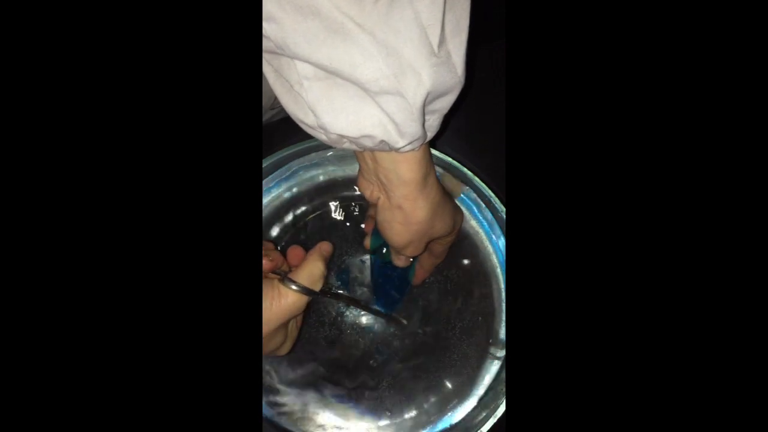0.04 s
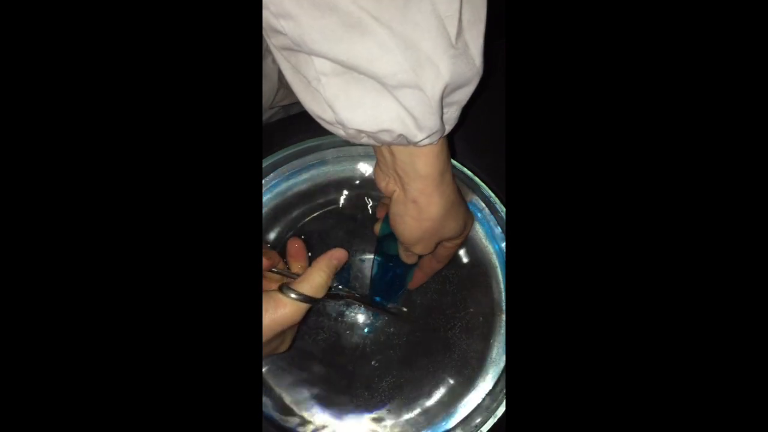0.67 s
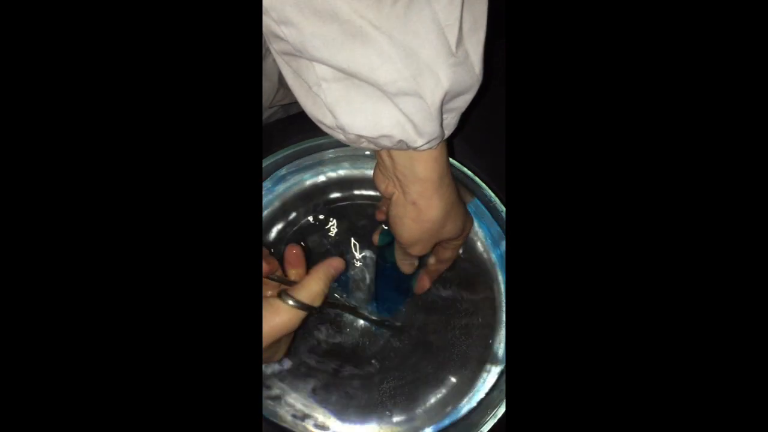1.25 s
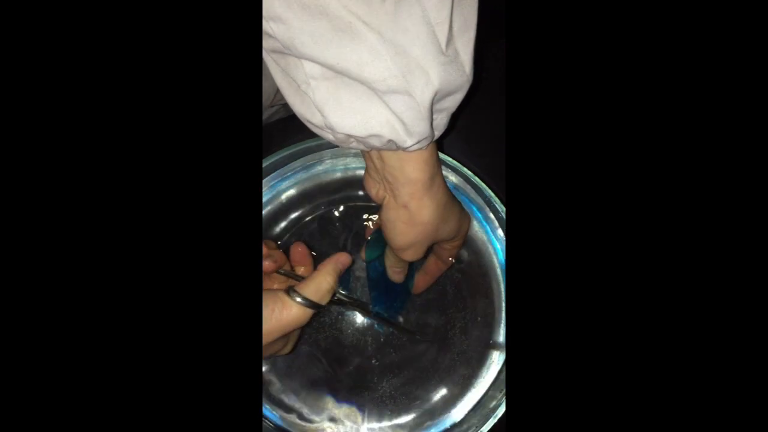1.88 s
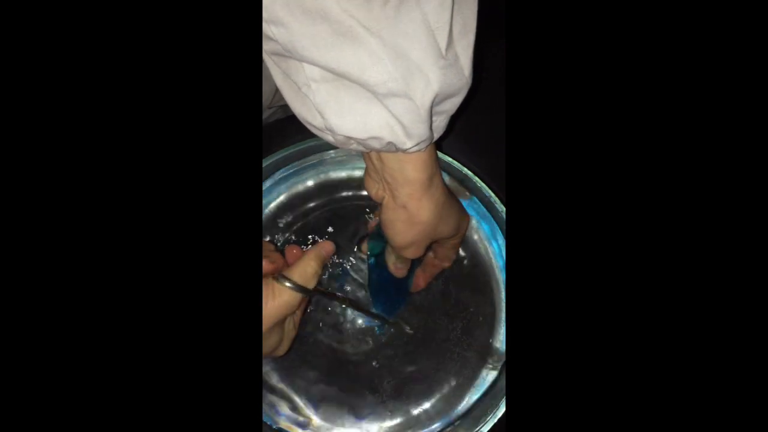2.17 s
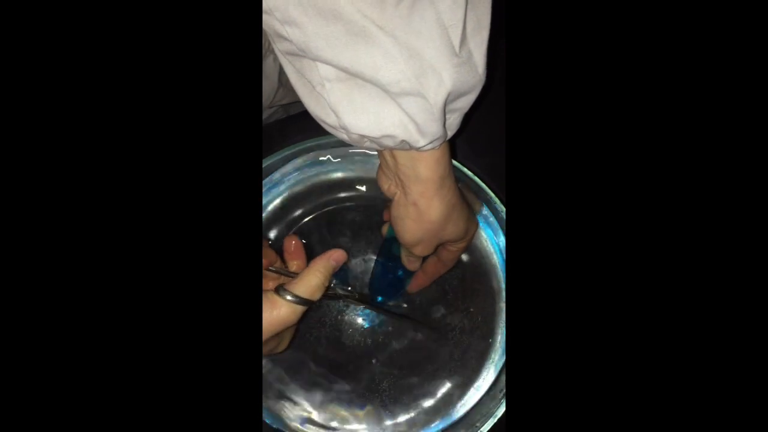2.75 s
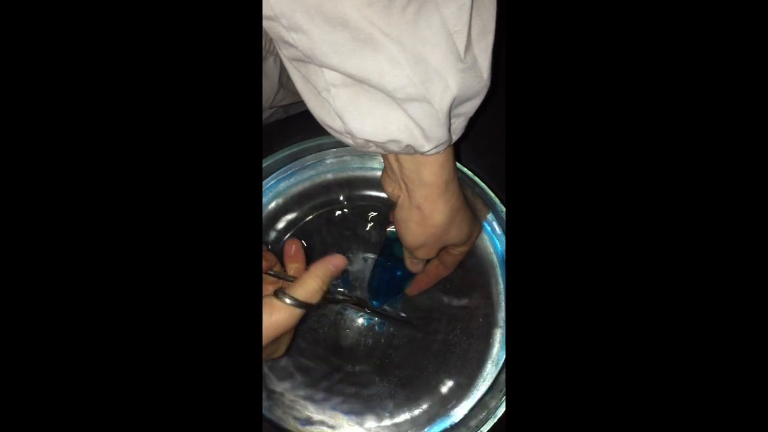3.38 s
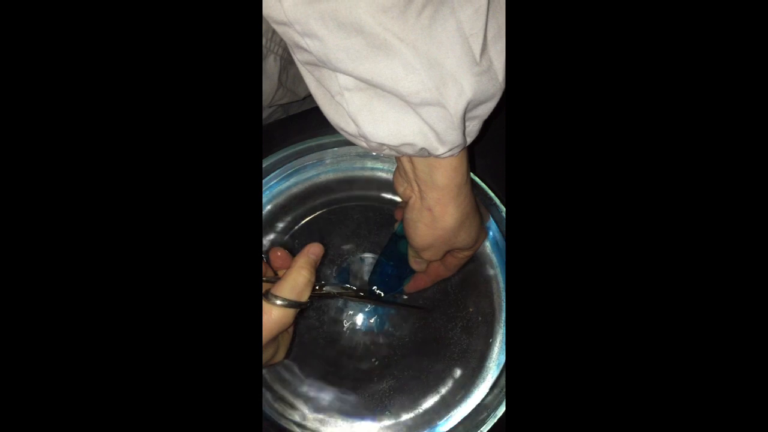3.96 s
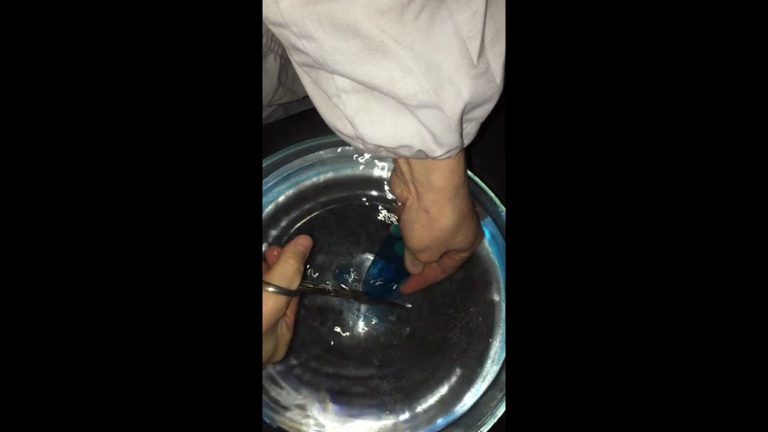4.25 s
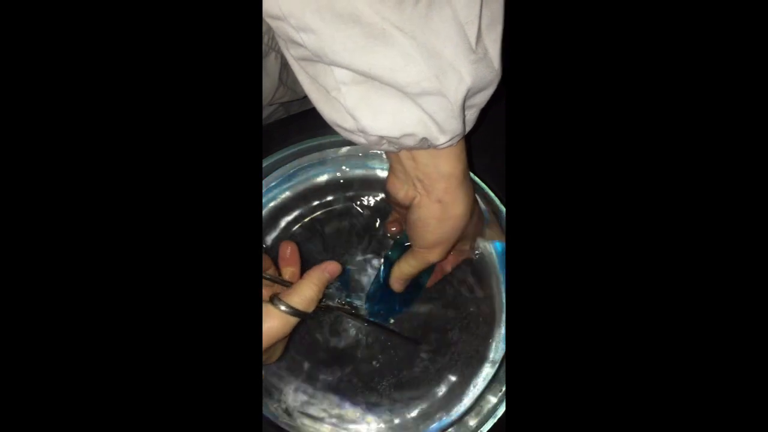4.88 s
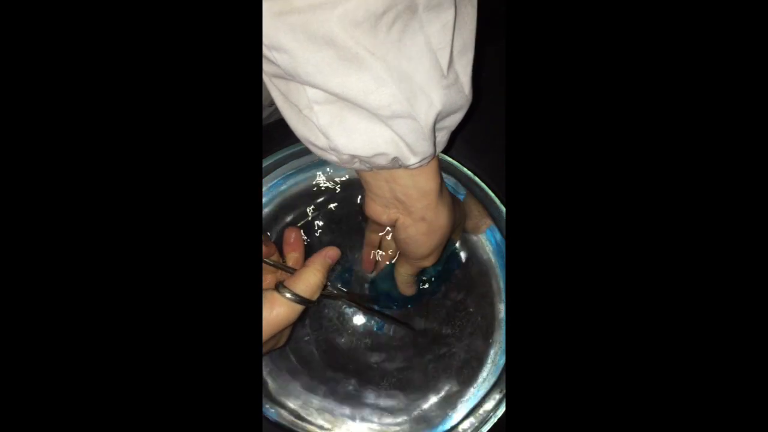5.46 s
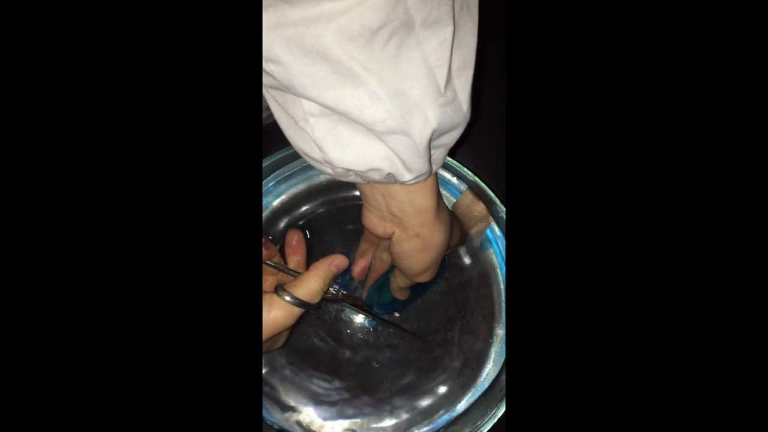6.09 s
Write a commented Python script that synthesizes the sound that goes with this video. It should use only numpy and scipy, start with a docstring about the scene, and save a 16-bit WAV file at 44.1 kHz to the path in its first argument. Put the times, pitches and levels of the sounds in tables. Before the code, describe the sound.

Scissors cut a sheet of glass under water in a bowl, heard up close in a small room. A faint scrape and one sharp crack come right at the start. Further bites follow at about 1.0, 2.1, 3.1 and 4.0 to 4.3 seconds, each a faint scrape of the blades and then a quick cluster of crisp, crunchy cracks. The cracks ring briefly and come with a hollow water knock and a low thud from the bowl. Between bites the glass taps softly, the scissors clink lightly and the water laps a little. At about 4.3 seconds a distinct bubble plops, followed at once by a steel clink. From there to about 6 seconds it is quieter, with a few small clinks, taps, bubbles and gentle laps. A soft low rumble of stirred water and a faint room hiss and hum lie underneath.

```python
"""A faint scrape, then a sharp crack: scissors nibble at a sheet of glass under water in a bowl.
In each of five bites the blades scrape, then the glass gives in bursts of tiny fractures that ring
the steel and jolt the bowl on its table. In between, the sheet taps and the scissors clink.
The hands stir the water, which laps, bubbles and rumbles. The small room hisses and hums faintly."""
import sys
import numpy as np
from scipy import signal
from scipy.fft import rfft, irfft
from scipy.io import wavfile

SR = 44100
rng = np.random.default_rng(int(sys.argv[2]) if len(sys.argv) > 2 else 0)


def wrap_up_sound(samples):
    """Save the sound to the file named by the first command line argument, as 16-bit audio."""
    columns = np.atleast_2d(samples).T
    # keep every value between -1 and 1, then stretch to whole-number steps
    tamed = np.clip(columns, -1, 1)
    steps = np.round(tamed * 32767).astype(np.int16)
    wavfile.write(sys.argv[1], SR, steps)


N = 270333

# Tilt is how far the treble stands above the lows. Decay is the time to fade by 60 dB.
# the glass cracks, once or more per bite: t/s, length/s, level/dB, tilt/dB, water knock/dB, bowl thud/dB
GLASS_CRACKS = [(0.0528, 0.0012, -43.5, 11, -37.5, -47), (0.8498, 0.00062, -56.5, 8.5, -61, -53.5),
                (0.9641, 0.0053, -40, 7.5, -41, -37.5), (1.0327, .0059, -34, 10.5, -40.5, -36.5),
                (1.079, .001, -52, 11.5, -49, -53.5), (1.901, .003, -56.5, 5, -66.5, -51.5),
                (2.03, 0.0035, -53, 5.5, -58.5, -68), (2.1059, 0.0023, -46.5, 3, -43.5, -46.5),
                (2.1386, 0.00053, -50.5, 9, -56.5, -65), (2.158, 0.012, -32, 9, -40, -37.5),
                (2.23, 0.0031, -36, 12.5, -42, -44.5), (2.9911, 0.0023, -47.5, 9.5, -47, -47),
                (3.0414, 0.0055, -46, 15, -49, -53), (3.0867, 0.0039, -44.5, 14, -43, -49.5),
                (3.1328, .0046, -38.5, 14, -34.5, -33.5), (3.143, 0.0013, -42.5, 8.5, -59, -59),
                (3.882, 0.0019, -61, 14.5, -68.5, -53.5), (3.949, .0006, -47.5, 17.5, -51.5, -45.5),
                (4.0165, 0.0057, -36.5, 10.5, -47.5, -45.5), (4.0666, .0008, -43, 12, -55, -59),
                (4.1407, 0.003, -37, 10, -48.5, -55.5), (4.1978, 0.0028, -62.5, 19.5, -71.5, -63.5),
                (4.2736, 0.0026, -34.5, 16.5, -36.5, -47), (4.29, .002, -40.5, -18, -51, -54.5)]
# tone colour of one fracture: f/Hz, level/dB
FRACTURE_COLOUR = [(150, -9), (400, -7), (1000, -3.5), (1500, -3.5), (2300, 6.5), (3500, -3), (4800, -7.5),
                   (5300, -1), (7600, 2), (9500, 2.5), (10300, -3), (11600, 3.5), (13800, 1), (15500, -6)]
# ringing tones of glass and blades under water: f/Hz, level/dB
GLASS_TONES = [(680, -9), (1020, -12.5), (1210, -5.5), (2080, -9.5), (2300, -3), (2720, -2.5), (4100, -9),
               (4420, -2.5), (5210, -3), (5500, -2.5), (6080, -2), (6800, -6.5), (7280, -6), (7900, -3.5),
               (8650, -3), (9250, -6), (9800, 2.5), (11580, 0)]
# bowl and table rocking: f/Hz, level/dB, decay/s
THUD_TONES = [(44, -12, 0.17), (54.4, -7.5, 0.88), (81.44, 6, 0.65), (100.37, -2.5, 0.75), (130.3, -6, .55)]
# ringing walls of the water-filled bowl: f/Hz, level/dB, decay/s
WALL_TONES = [(176.7, -2.5, 0.74), (255.7, -4, 0.96), (311, -2, 0.66), (329, -0.5, 0.35),
              (351.2, -2.5, 0.54), (444.3, -13, 0.13), (542, -4.5, 0.69), (574, -7.5, 0.33)]
# hollow knock of water pushed aside by the blades: f/Hz, level/dB, decay/s
KNOCK_TONES = [(204.7, -10, 0.043), (297.5, 4.5, 0.082), (400, -6, 0.017), (545, -9.5, 0.04),
               (686.4, -3.5, 0.068)]
# blades grinding on the edge of the glass: t/s, length/s, level/dB, tilt/dB
BLADE_SCRAPES = [(0, 0.052, -73.5, 13.5), (0.815, 0.027, -65, 6.5), (0.849, 0.031, -65.5, 3.5),
                 (0.88, 0.031, -80, 14), (1.299, 0.045, -74.5, 5), (1.869, .055, -67, 13.5),
                 (1.935, 0.21, -77.5, 12), (2.037, 0.013, -60, 1), (2.431, 0.06, -64.5, 13),
                 (2.864, 0.045, -74, 13), (2.909, 0.034, -66.5, 15.5), (2.984, 0.027, -59.5, 4.5),
                 (3.825, 0.025, -71, 14), (3.929, 0.072, -70.5, 9.5), (4.562, 0.024, -67.5, 1.5)]
# the sheet taps blade or bowl, or a hand nudges the bowl: t/s, level/dB, tilt/dB, water knock/dB, bowl thud/dB
TAPS_AND_NUDGES = [(.456, -67, -8, -53.5, -50.5), (0.649, -72, -20, -57.5, -70), (1.18, -63.5, -2.5, -60, -81),
                   (1.68, -57.5, -15.5, -57, -69), (1.859, -57.5, -0.5, -53.5, -55),
                   (2.675, -65.5, -29, -73, -73), (3.185, -52.5, -12, -70, -69),
                   (3.418, -71.5, -29, -64.5, -65.5), (3.597, -53, -11, -52.5, -63),
                   (5.034, -100, -12, -59, -63), (5.891, -68, -8, -67, -72.5)]
# the scissors open or shut: t/s, click level/dB, tilt/dB, ring/dB, bowl thud/dB
STEEL_CLINKS = [(0.563, -63, -8.5, -51, -60), (2.39, -58, -16, -57.5, -62), (2.413, -62, -14, -55, -72),
                (4.362, -42.5, -12, -46, -46.5), (4.587, -53, 0, -49.5, -70),
                (4.902, -92, -9, -66.5, -83.5), (5.161, -54, 4, -48.5, -81)]
# ringing tones of the scissors: f/Hz, level/dB
STEEL_TONES = [(1180, -6), (2440, -0.5), (2990, 2), (4100, -5), (5300, -4)]
# bubbles in the stirred water: t/s, f/Hz, level/dB, decay/s, glide/(octaves per s)
WATER_BUBBLES = [(.59, 1110, -57, .07, 0), (0.65, 1134, -50.5, 0.035, 10), (1.315, 900, -53.5, 0.087, 1.5),
                 (1.862, 990, -42.5, 0.069, 7), (4.2912, 710, -18.5, 0.023, -17),
                 (4.303, 660, -37, 0.18, 2), (4.315, 852.4, -38.5, 0.072, 1), (5.441, 978, -61, 0.39, 0),
                 (5.479, 850, -51.5, 0.11, -0.5), (5.5, 498, -56.5, .12, -4), (5.975, 1270, -57, .08, -4)]
# water lapping round the wrists: t/s, length/s, level/dB, centre f/Hz
WRIST_LAPS = [(0.588, 0.057, -69.5, 2180), (1.293, 0.048, -69.5, 1430), (1.84, 0.034, -65.5, 1010),
              (3.437, 0.041, -76, 1910), (5.476, .08, -68.5, 1390), (5.953, 0.032, -74.5, 1400)]
# rumble of the hands stirring the water: t/s, level/dB
STIR_LEVELS = [(0.0, -61), (0.08, -55), (0.24, -91), (0.48, -74), (0.7, -89), (1.09, -48), (1.4, -77.5),
               (2.1, -60.5), (2.24, -50.5), (2.78, -83), (3.07, -58), (3.62, -69), (3.94, -59),
               (6.13, -82.5)]
# the room's echo: f/Hz, level against the direct sound/dB, decay/s
ROOM_ECHO = [(207, -3, 0.83), (609, -15, .45), (1500, -9, 0.22), (3027, -9.5, 0.29), (5715, -15.5, 0.32),
             (10000, -18, 0.27), (15000, -20, 0.22)]
# tone colour of the room's hiss: f/Hz, relative level/dB
HISS_COLOUR = [(30, -14), (58, -12), (78, -23), (100, -17), (120, -8.5), (150, -18), (250, -16.5),
               (400, -23.5), (700, -27), (2100, -28), (6200, -33), (15500, -38.5)]

LOW_EDGE_HZ, TREBLE_EDGE_HZ, TOP_HZ = 1400, 4700, 15400


def cracks(steady_db=-48, jolt_lag_s=0.0016):
    """Each crack runs until the chip comes free; the blades snap shut and jolt the bowl."""
    out = np.zeros(N)
    for start, length, db, tilt_db, knock_db, thud_db in GLASS_CRACKS:
        growth_db = 0.32 * (db - steady_db)  # a strong crack swells as it runs, a weak one fades
        add(out, start, snap(length, db, tilt_db, growth_db, break_db=7.5))
        add(out, start + jolt_lag_s, jolt(knock_db, thud_db))
    return out


def snap(length, db, tilt_db, growth_db, break_db=0, break_s=0.00033):
    """A burst of fractures, then softer pattering crumbs; the level is as if spread over 10 ms."""
    out = np.zeros(SR // 4)
    progress = np.linspace(0, 1, max(int(length * SR), 8))
    last_instant = np.exp((progress - 1) * length / break_s)  # the chip lets go
    force = undb(growth_db * progress + break_db * last_instant)
    settling = undb(-60 * seconds(0.065) / 0.06)
    add(out, 0, crunch(force, db, tilt_db, length=0.01, per_s=5000))
    add(out, length, undb(-15) * crunch(settling, db, tilt_db, length=0.01, per_s=500))
    return out


def crunch(force, db, tilt_db, length, per_s, spread_db=1.5, ring_db=-5, wash_db=-3):
    """Tiny fractures of uneven size follow the force: a clean break is bright, a blunt touch dull."""
    dice = np.random.default_rng(rng.integers(2 ** 31))
    chance, size, direction = dice.random((len(force), 3)).T
    breaks = chance < per_s / SR
    breaks[0] = True
    fractures = breaks * force * undb(-spread_db * np.log(1 - size)) * np.sign(direction - .5)
    direct = signal.fftconvolve(fractures, one_fracture(ring_db))
    # each fracture lies elsewhere, so their echoes in the water blur into a brief wash of noise
    fade = unit(undb(-60 * seconds(.1) / 0.024))
    wash_power = np.abs(signal.fftconvolve(fractures ** 2, fade ** 2))
    wash = np.sqrt(wash_power) * dice.standard_normal(len(direct))
    sound = signal.fftconvolve(direct + undb(wash_db) * wash, click(FRACTURE_COLOUR))
    treble = undb(db + 0.89 * tilt_db) * unit(band(sound, TREBLE_EDGE_HZ, 18000, order=5))
    middle = undb(db) * unit(band(sound, LOW_EDGE_HZ, TREBLE_EDGE_HZ))
    lows = undb(db - 0.11 * tilt_db) * unit(band(sound, 330, LOW_EDGE_HZ))
    return (treble + middle + lows) * np.sqrt(length * SR)


def one_fracture(ring_db, chip_db=-5):
    """A sharp click, a puff of noise from the chip and a short ring of glass and blades."""
    t = seconds(.1)
    tones = [(hz, db, .026 * np.sqrt(3000 / hz)) for hz, db in GLASS_TONES]  # water damps highs first
    sound = undb(ring_db) * unit(ring(tones, .1, detune=.03, scatter_db=3))
    sound += undb(chip_db) * unit(rng.standard_normal(len(t)) * undb(-60 * t / .005))
    sound[0] += 1  # the click
    return sound


def jolt(knock_db, thud_db, bowl_rise_s=.008, knock_rise_s=0.0007):
    """The water knocks at once; the bowl's rocking builds up, and its walls ring with both."""
    t, push_db = seconds(1), (knock_db + thud_db) / 2
    thud = undb(thud_db - 3) * ring(THUD_TONES, 1, detune=.008)
    walls = undb(push_db - 18) * ring(WALL_TONES, 1, detune=.005, scatter_db=1.5)
    knock = undb(knock_db - 1) * ring(KNOCK_TONES, 1, detune=.05)
    return (thud + walls) * (1 - np.exp(-t / bowl_rise_s)) + knock * (1 - np.exp(-t / knock_rise_s))


def scrapes(slips_per_s=120):
    """Blades slide on glass: a fine crackle that swells and fades, catching and slipping on the way."""
    out = np.zeros(N)
    grip_db = 3 * np.interp(np.arange(N) / SR * slips_per_s, np.arange(N), rng.standard_normal(N))
    for start, length, db, tilt_db in BLADE_SCRAPES:
        swell = signal.windows.tukey(int(length * SR), .5)
        force = swell * undb(grip_db[int(start * SR):][:len(swell)])
        crackle = crunch(force, db, tilt_db, length, per_s=1500, spread_db=3.5, ring_db=-3.5, wash_db=-5.5)
        add(out, start, undb(-1) * crackle)
    return out


def taps(tap_s=0.0054):
    """The sheet touches blade or bowl, or a hand nudges the bowl: a blunt, gritty tap with a hollow knock from
    the water."""
    out = np.zeros(N)
    for start, db, tilt_db, knock_db, thud_db in TAPS_AND_NUDGES:
        add(out, start, snap(tap_s, db, tilt_db, growth_db=1.5))
        add(out, start, jolt(knock_db, thud_db))
    return out


def clinks(click_s=0.0041, decay_s=0.052):
    """Steel on steel: a click and a jolt, and both halves of the scissors ring, a little out of tune."""
    out = np.zeros(N)
    tones = [(hz, db, decay_s) for hz, db in STEEL_TONES]
    for start, db, tilt_db, ring_db, thud_db in STEEL_CLINKS:
        halves = ring(tones, .3, detune=0.027) + ring(tones, .3, detune=0.02)
        add(out, start, snap(click_s, db, tilt_db, growth_db=-2))
        add(out, start, undb(ring_db - 5) * halves)
        add(out, start, jolt(thud_db - 4, thud_db))
    return out


def bubbles():
    """Each bubble rings as a fading tone, most of them gliding; the slow ones swell in softly."""
    out, t = np.zeros(N), seconds(.3)
    for start, hz, db, decay_s, glide in WATER_BUBBLES:
        phase = 2 * np.pi * np.cumsum(hz * 2 ** (glide * t)) / SR
        swell = 1 - np.exp(-40 * t / decay_s)
        add(out, start, np.sin(phase) * undb(db - 60 * t / decay_s) * swell)
    return out


def laps(count=26, spread_octaves=0.74, cycles=50):
    """Each lap of water traps a cloud of tiny bubbles that rise in pitch as they fade."""
    out, t = np.zeros(N), seconds(.1)
    for start, length, db, centre_hz in WRIST_LAPS:
        cloud = np.zeros(int(length * SR) + len(t))
        for when, offset in zip(rng.random(count), rng.standard_normal(count)):
            hz = centre_hz * 2 ** (spread_octaves * np.clip(offset, -2, 2))
            age = t * hz / cycles  # 1 when the bubble has died away
            tone = np.sin(2 * np.pi * hz * t * (1 + age / 10))
            loudness = np.sin(np.pi * when) * undb(-60 * age) * (1 - np.exp(-20 * age))
            add(cloud, when * length, loudness * tone)
        add(out, start, undb(db) * unit(cloud) * np.sqrt(length * SR))
    return out


def rumble(lo_hz=46, hi_hz=70, rise_s=0.031, fall_s=.05):
    """Water and bowl rumble as the hands stir, bear down before each crack and let go after it."""
    t = np.arange(N) / SR
    power = undb(np.interp(t, *np.transpose(STIR_LEVELS))) ** 2
    for start, *_, thud_db in GLASS_CRACKS:
        swell = np.exp(-np.maximum((start - t) / rise_s, (t - start) / fall_s))
        power += (undb(thud_db - 15.5) * swell) ** 2
    return unit(band(rng.standard_normal(N), lo_hz, hi_hz)) * np.sqrt(N * power)


def room_echo(sound, rise_s=0.00073):
    """A small room answers with a blurred echo, weak and short in the treble."""
    t, tail = seconds(0.3), 0
    hz_points, levels_db, decays_s = np.transpose(ROOM_ECHO)
    for hz in 180 * 2 ** np.arange(0, 6.5, .5):  # bands half an octave wide
        centre, top = hz * 2 ** (1 / 4), hz * np.sqrt(2)
        decay_s = value_at(np.c_[hz_points, decays_s], centre)
        fade = undb(-60 * t / decay_s) * (1 - np.exp(-t / rise_s))
        part = unit(band(rng.standard_normal(len(t)) * fade, hz, top)) * np.sqrt(2 * (top - hz) / SR)
        tail = tail + undb(value_at(np.c_[hz_points, levels_db], centre)) * part
    return signal.fftconvolve(sound, tail)[:N]


def hiss_and_hum(hiss_db=-73.5, hum_db=-71.5, hum_hz=100):
    """Faint room hiss and the steady hum of mains electricity."""
    colour = undb(value_at(HISS_COLOUR, np.fft.rfftfreq(N, 1 / SR)))
    hiss = irfft(rfft(rng.standard_normal(N)) * colour, N)
    hiss *= undb(hiss_db) / np.std(band(hiss, 130, TOP_HZ))
    hum = undb(hum_db) * np.sqrt(2) * np.sin(2 * np.pi * hum_hz * np.arange(N) / SR)
    return hiss + hum


def ring(tones, length, detune, scatter_db=1):
    """Fading tones of a struck object; each blow lands elsewhere, so their mix varies by chance."""
    t, out = seconds(length), 0
    for hz, db, decay_s in tones:
        louder, higher = rng.standard_normal(2)
        tone = np.sin(2 * np.pi * hz * (1 + detune * higher) * t)
        out = out + undb(db + scatter_db * louder) * tone * undb(-60 * t / decay_s)
    return out


def click(colour, size=512):
    """The shortest pulse with a given tone colour."""
    gains = undb(value_at(colour, np.fft.rfftfreq(size, 1 / SR)))
    cepstrum = irfft(np.log(gains))
    # folding the second half onto the first packs the energy at the start of the pulse
    cepstrum[1:size // 2] *= 2
    cepstrum[size // 2 + 1:] = 0
    return irfft(np.exp(rfft(cepstrum)))


def band(x, lo_hz, hi_hz, order=3):
    """Keep the sound between two frequencies."""
    return signal.sosfilt(signal.butter(order, [lo_hz, hi_hz], "band", fs=SR, output="sos"), x)


def value_at(points, hz):
    """Read between (f/Hz, value) points, with octaves evenly spaced."""
    f, value = np.transpose(points)
    return np.interp(np.log(hz + 1), np.log(f), value)


def undb(db):
    """Turn decibels into a gain."""
    return 10 ** (np.asarray(db) / 20)


def seconds(length):
    """Time axis of a given length."""
    return np.arange(int(length * SR)) / SR


def unit(x):
    """Scale to an energy of one."""
    return x / np.sqrt(np.sum(x ** 2))


def add(track, start, x):
    """Mix x into the track at a given time."""
    i = max(int(start * SR), 0)
    track[i:i + len(x)] += x[:len(track[i:])]


def scene():
    """Everything in the bowl, with the room around it."""
    near = cracks() + scrapes() + taps() + clinks() + bubbles() + laps()
    return (near + room_echo(near) + rumble() + hiss_and_hum())[None]


def record(dry, low_cut_hz=32):
    """A nearby phone drops the deepest bass and the highest treble."""
    thin = signal.sosfilt(signal.butter(2, low_cut_hz, "high", fs=SR, output="sos"), dry)
    return signal.sosfilt(signal.ellip(8, .2, 70, TOP_HZ, fs=SR, output="sos"), thin)


dry = scene()
out = record(dry)
wrap_up_sound(out)
```